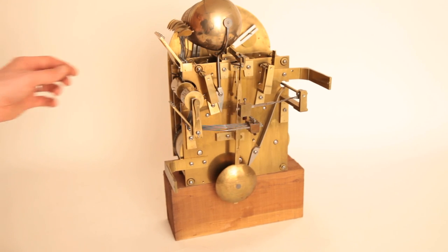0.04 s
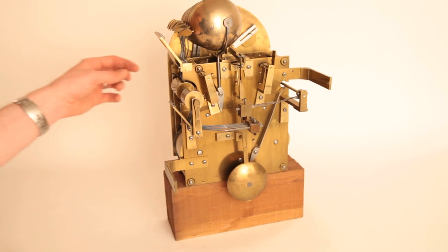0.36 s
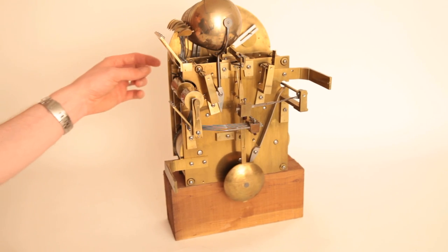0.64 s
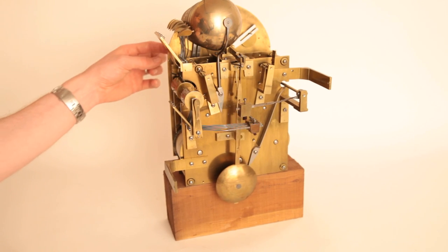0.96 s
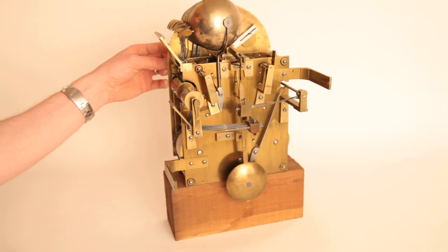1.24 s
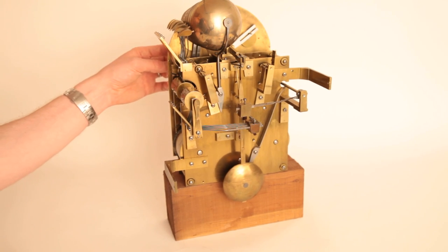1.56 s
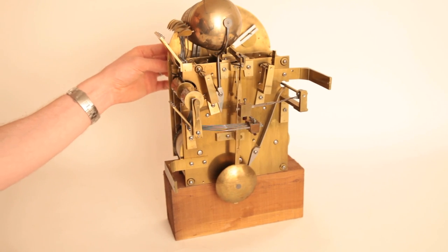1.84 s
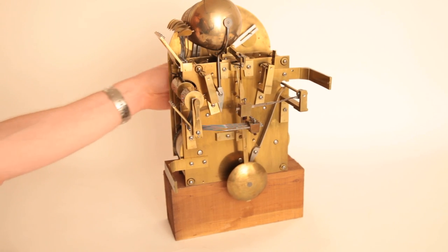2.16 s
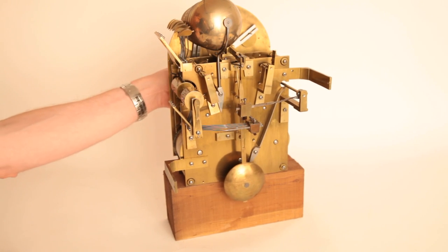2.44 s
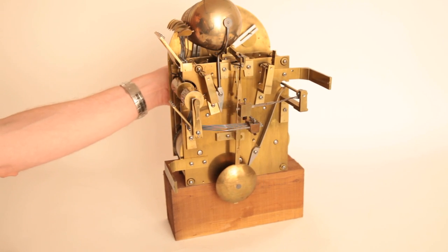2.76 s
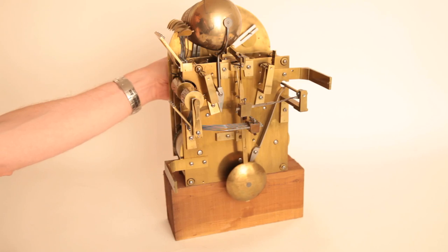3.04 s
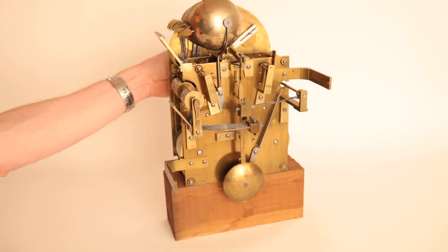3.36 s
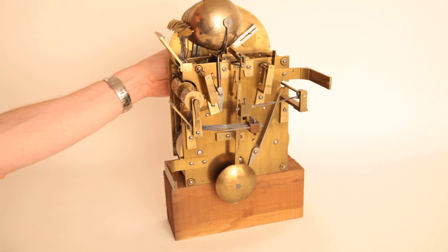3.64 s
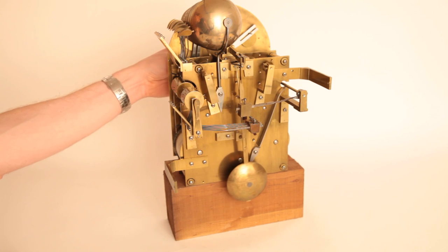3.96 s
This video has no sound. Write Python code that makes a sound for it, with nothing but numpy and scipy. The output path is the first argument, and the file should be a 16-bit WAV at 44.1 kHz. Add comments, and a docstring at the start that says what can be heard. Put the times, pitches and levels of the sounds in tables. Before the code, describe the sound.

Clockwork ticks nearby in a quiet room, alternating bright ticks and duller tocks, after a soft knock. Cloth brushes faintly and a lever clicks, then a catch snaps loudly free and brass parts briefly jangle and rattle.

```python
"""An open brass clock movement on a wooden block ticks, slightly out of beat, in a quiet room.
Each tick is a wheel tooth landing on a pallet, a small stop that rocks to and fro. Something knocks once.
Clothes brush as a hand reaches behind the clock and trips the strike train, the wheels that make it
strike: a catch snaps free, a lever drops, a springy arm jangles three times and the wheels click round.
Most hits are a burst of noise (the crack) plus a few fading tones (the ring)."""
import sys
import numpy as np
from scipy import signal
from scipy.fft import rfft, irfft, next_fast_len
from scipy.io import wavfile
from scipy.ndimage import map_coordinates

SR = 44100
rng = np.random.default_rng(int(sys.argv[2]) if len(sys.argv) > 2 else 0)


def log_audio(samples):
    """Write samples as a 16-bit WAV file to the path given in sys.argv[1]."""
    # one column per channel
    frames = np.atleast_2d(samples).T
    # limit to full scale, then quantise
    limited = np.clip(frames, -1, 1)
    pcm = np.round(limited * 32767).astype(np.int16)
    wavfile.write(sys.argv[1], SR, pcm)


N = 176400  # 4 seconds
SCENE_TIME = np.arange(N) / SR
HIT_TIME = np.arange(SR // 2) / SR  # each hit gets half a second


def amp(db):
    """Turn decibels into a number to multiply by."""
    return 10 ** (np.asarray(db) / 20)


def unit(x):
    """Scale a sound to an average strength (rms) of 1."""
    return x / np.sqrt(np.mean(x ** 2) + 1e-20)


def along(points, hz):
    """Read between the rows of a table, on a log pitch scale."""
    pitches, values = np.transpose(points)
    return np.interp(np.log(hz + 1), np.log(pitches + 1), values)


def fade(fade_s, t=HIT_TIME):
    """Die away by 60 dB every fade_s seconds."""
    return np.exp(-np.log(1000) * t / fade_s)


def rise(rise_s):
    """Climb smoothly from silence to full strength."""
    return 1 - np.exp(-(HIT_TIME / rise_s) ** 2)


def noise(colour, size):
    """Noise whose colour table says how strong each pitch is."""
    gains = amp(along(colour, np.fft.rfftfreq(size, 1 / SR)))
    return unit(irfft(rfft(rng.standard_normal(size)) * gains, size))


def wobble(rate, size=len(HIT_TIME)):
    """A smooth curve through `rate` random values a second."""
    return map_coordinates(rng.standard_normal(int(size * rate / SR) + 4), [np.arange(size) * rate / SR])


def ring(tones, rise_s, rough, peak_s=0):
    """A struck part's fading tones, roughly in step at peak_s; loose parts make them flutter."""
    flutter_db = 2.5 * rough
    out = 0
    for hz, db, fade_s in tones:
        strength = amp(db + rng.normal() + flutter_db * wobble(207))
        phase = 2 * np.pi * hz * (HIT_TIME - peak_s) + rough * wobble(153)
        out += strength * fade(fade_s) * np.sin(phase)
    return out * rise(rise_s)


def crack(colour, rise_s, fade_s, wash_db, wash_s):
    """Two parts meet: a short burst of noise, then a longer wash of many weak tones."""
    return noise(colour, len(HIT_TIME)) * rise(rise_s) * (fade(fade_s) + amp(wash_db) * fade(wash_s))


# How long the room echoes: pitch_hz, fade_s
ECHO_FADES = [(200, 0.16), (1500, 0.27), (6000, 0.23), (10000, 0.14), (15000, 0.036)]
def add(track, start_s, sound, echo_db=-10.5):
    """Put a hit on the track, with its echo from the room."""
    size = len(HIT_TIME)
    hz, t, bands = signal.stft(rng.standard_normal(size), SR, nperseg=256)
    bands *= fade(along(ECHO_FADES, hz)[:, None], t)
    tail = signal.istft(bands, SR, nperseg=256)[1][:size] * rise(0.0086)
    echo = signal.fftconvolve(sound, tail / np.linalg.norm(tail))[:size]
    part = track[round(start_s * SR):][:size]
    part += (sound + amp(echo_db) * echo)[:len(part)]


# The still air: pitch_hz, level_db
AIR_COLOUR = [(12, -40), (20, -9), (81, -4.5), (192, -6.5), (233, -12), (268, -3), (335, -10.5),
              (386, -4.5), (456, -8), (754, -4.5), (1050, -9.5), (1210, -7), (1840, -16), (12600, -32.5),
              (15800, -35)]
# Faint tones in the room: pitch_hz, level_db
HUM_TONES = [(398, -68), (739, -62.5), (761, -61), (861, -66)]
# Those tones swell a little: time_s, boost_db
HUM_SWELL = [(.3, 0.5), (1.05, 3), (1.7, 0), (3.5, 0)]
# A low rumble comes and goes: time_s, level_db
RUMBLE_LEVEL = [(0, -57), (.25, -52), (.7, -59), (1.3, -58.5), (4, -78.5)]
def room_tone():
    """The quiet room: still air, a wavering hum and a low rumble."""
    hum = 0
    for hz, db in HUM_TONES:
        strength = 1 + 0.35 * wobble(15, N)
        phase = 2 * np.pi * hz * SCENE_TIME + 1.22 * wobble(14, N)
        hum += amp(db) * unit(strength * np.sin(phase))
    hum *= amp(np.interp(SCENE_TIME, *np.transpose(HUM_SWELL)))
    rumble = noise([(15, -19), (50, -0.5), (150, -6.5), (600, -24), (3000, -63)], N)
    rumble *= amp(np.interp(SCENE_TIME, *np.transpose(RUMBLE_LEVEL)))
    return amp(-49.5) * noise(AIR_COLOUR, N) + hum + rumble


# How loudly the clothes brush: time_s, level_db
BRUSH_LEVEL = [(0, -55.5), (.13, -54), (.5, -57.5), (.95, -56.5), (1.2, -62.5), (1.9, -62.5), (2.1, -57),
               (2.35, -64), (4, -67.5)]
def clothes():
    """Cloth rubs with a soft hiss as the hand reaches in."""
    hiss = noise([(500, 5.5), (2500, -4.5), (6500, 0), (9000, -6), (14000, -24)], N)
    return amp(np.interp(SCENE_TIME, *np.transpose(BRUSH_LEVEL))) * hiss


# The knock's low ring: pitch_hz, level_db, fade_s
KNOCK_TONES = [(216, -9, .12), (299, -1, 0.13), (495, 5, 0.13), (806, -9.5, 0.16), (1136, -4, 0.16)]
# The knock's thud: pitch_hz, level_db
KNOCK_COLOUR = [(60, -20), (200, 2.5), (400, 2), (850, 3), (2000, -8.5), (3500, -14), (6000, -24.5),
                (14000, -46)]
def knock(start_s=0.078, level_db=-32):
    """One dull, wooden-sounding knock."""
    out = np.zeros(N)
    thud = crack(KNOCK_COLOUR, rise_s=0.0045, fade_s=0.13, wash_db=-7, wash_s=0.3)
    body = amp(-4.5) * ring(KNOCK_TONES, rise_s=0.0032, rough=0.56)
    add(out, start_s, amp(level_db) * (thud + body))
    return out


# The toothed wheel and its pallets ringing: pitch_hz, level_db, fade_s
WHEEL_TONES = [(2510, -5.5, .08), (3725, -8, 0.057), (5246, -3, .05), (7650, -1, 0.051), (8000, -1, 0.049),
               (8740, -13, 0.062), (11230, -15.5, .11)]
# That wheel's clearest tone: pitch_hz, level_db, fade_s
WHEEL_PING = [(5465, 0, 0.089)]
# The crack of a tooth landing: pitch_hz, level_db
TOOTH_COLOUR = [(200, -22), (1200, 5), (2800, -2), (3700, 3), (4500, 3), (5500, 4.5), (8000, -1),
                (10500, -8), (15500, -25)]
# The bright beats: start_s, crack_db, ring_db, ping_db
TICKS = [(.384, -37.5, -50, -47), (1.2852, -38.5, -40, -43), (2.1895, -41, -43.5, -46),
         (3.085, -40, -57, -40)]
def ticks():
    """A tooth falls on the first pallet and the wheel rings brightly."""
    out = np.zeros(N)
    for start_s, crack_db, ring_db, ping_db in TICKS:
        hit = amp(crack_db) * crack(TOOTH_COLOUR, rise_s=0.0007, fade_s=0.023, wash_db=-11, wash_s=0.24)
        wheel = amp(ring_db) * ring(WHEEL_TONES, rise_s=0.0012, rough=0.97)
        ping = amp(ping_db) * ring(WHEEL_PING, rise_s=0.0002, rough=1)
        add(out, start_s, hit + wheel + ping)
    return out


# The lower clack that follows each tock: pitch_hz, level_db
CLACK_COLOUR = [(200, -8), (1300, 7), (2400, 7), (3100, -6), (4000, -7), (6500, -13), (9000, -20),
                (15000, -35)]
# The dull beats: start_s, crack_db, ring_db
TOCKS = [(0.7322, -46.5, -53), (1.634, -45, -52.5), (2.5376, -47, -48), (3.4387, -47, -52.5)]
def tocks(clack_delay_s=0.0076, clack_boost_db=2):
    """On the swing back a tooth falls on the other pallet, making a duller double contact."""
    out = np.zeros(N)
    for start_s, crack_db, ring_db in TOCKS:
        hit = crack(TOOTH_COLOUR, rise_s=0.00072, fade_s=0.033, wash_db=-12.5, wash_s=0.17)
        wheel = ring(WHEEL_TONES, rise_s=0.00082, rough=0.44)
        add(out, start_s, amp(crack_db) * hit + amp(ring_db) * wheel)
        clack = crack(CLACK_COLOUR, rise_s=0.00032, fade_s=0.022, wash_db=-12, wash_s=0.14)
        add(out, start_s + clack_delay_s, amp(crack_db + clack_boost_db) * clack)
    return out


# Fingers touch the lever: start_s, level_db, pitch_hz
NUDGES = [(2.725, -42, 4330), (2.902, -51, 6960), (2.912, -55, 7000), (2.935, -47, 4740),
          (2.9435, -40, 7050), (2.947, -41, 6600), (2.955, -43, 6700), (3.6244, -38.5, 5540),
          (3.634, -32, 7350)]
def nudges():
    """The lever gives small dry clicks under the fingers."""
    out = np.zeros(N)
    for start_s, db, hz in NUDGES:
        colour = [(hz / 4, -13), (hz / 2, -8), (hz, 0), (hz * 1.16, -9), (hz * 2, -26)]
        click = crack(colour, rise_s=0.00025, fade_s=0.025, wash_db=-15.5, wash_s=0.17)
        add(out, start_s, amp(db) * click)
    return out


# The brass frame ringing: pitch_hz, level_db, fade_s
FRAME_TONES = [(307, -14.5, 0.28), (1017, -9, 0.12), (1600, -5.5, 0.13), (2199, -13, 0.15),
               (2704, -11, 0.27), (2960, -7, 0.17), (5050, -11, 0.16), (5410, -13, 0.21), (6070, -6, 0.13),
               (8500, -8, .08), (10770, -6, 0.087)]
# The noise of a tap on the frame: pitch_hz, level_db
FRAME_COLOUR = [(100, -30), (300, -1), (1500, -4), (3000, 2.5), (4300, -0.5), (8500, -1), (11500, -15),
                (15500, -13)]
# Pins meet the frame: start_s, crack_db, ring_db
PIN_CLICKS = [(3.6442, -21, -43), (3.860, -27, -31), (3.9277, -32.5, -33.5), (3.936, -37, -41),
              (3.9736, -40, -35)]
def pin_clicks():
    """Pins on the wheels click against the frame and make it ring."""
    out = np.zeros(N)
    for start_s, crack_db, ring_db in PIN_CLICKS:
        hit = crack(FRAME_COLOUR, rise_s=0.0007, fade_s=0.018, wash_db=-11.5, wash_s=0.13)
        frame = ring(FRAME_TONES, rise_s=0.001, rough=0.31)
        add(out, start_s, amp(crack_db) * hit + amp(ring_db) * frame)
    return out


# The snap of the catch: pitch_hz, level_db
CATCH_COLOUR = [(100, -36), (200, -26), (350, -9), (1000, -1.5), (2000, -5), (3000, 6.5), (3700, 0),
                (6000, -2), (8400, 0), (10000, -6.5), (15500, -14)]
def catch(start_s, level_db=-6):
    """The catch snaps free with a loud crack that rings the frame."""
    out = np.zeros(N)
    snap = crack(CATCH_COLOUR, rise_s=0.00067, fade_s=0.013, wash_db=-15.5, wash_s=0.11)
    frame = amp(-15.5) * ring(FRAME_TONES, rise_s=0.00088, rough=0.57)
    add(out, start_s, amp(level_db) * (snap + frame))
    return out


def whirr(start_s, spin_up_s=0.29):
    """The freed wheels rattle softly, growing louder as they gather speed."""
    speed = np.clip((SCENE_TIME - start_s) / spin_up_s, 0, 1)
    return speed * amp(-44 + 1.8 * wobble(120, N)) * noise(FRAME_COLOUR, N)


# The lever ringing: pitch_hz, level_db, fade_s
LEVER_TONES = [(302.6, -33, 0.48), (3905, 5, 0.033), (4800, -3, 0.033), (5270, 2.5, 0.038),
               (6060, 1.5, 0.036), (6541, -16, 0.055), (7176, -9, 0.047)]
# The crack of the lever landing: pitch_hz, level_db
LEVER_COLOUR = [(130, -45), (300, -20), (1200, -21), (1700, -1), (2700, 3), (4000, -1), (8000, 4.5),
                (11000, -2.5), (15500, -11)]
# Its two landings: start_s, crack_db, ring_db
LEVER_DROPS = [(3.6673, -10.5, -13), (3.6897, -30, -24.5)]
def lever():
    """The lever drops, rings and bounces once."""
    out = np.zeros(N)
    for start_s, crack_db, ring_db in LEVER_DROPS:
        hit = crack(LEVER_COLOUR, rise_s=0.0015, fade_s=0.028, wash_db=-20, wash_s=0.083)
        clink = ring(LEVER_TONES, rise_s=0.0022, rough=0.71)
        add(out, start_s, amp(crack_db) * hit + amp(ring_db) * clink)
    return out


# The arm's low, middle and high tones: pitch_hz, level_db, fade_s
ARM_LOW = [(1490, -1.5, 0.16), (1480, -6, .12), (1551, 2, 0.14), (1667, -3, 0.06), (1684, -2.5, 0.11),
           (1837, -5, 0.11)]
ARM_MIDDLE = [(3010, -5, .08), (3130, 5, 0.052), (3330, -5.5, 0.064), (4330, -1, 0.045)]
ARM_HIGH = [(4280, -2.5, 0.038), (5945, 2.5, 0.065), (6030, -1.5, 0.066), (6470, -3, .06),
            (6570, -14, 0.068), (7130, -5, 0.075), (7300, -6.5, .08)]
# The plate that carries the arm: pitch_hz, level_db, fade_s
PLATE_TONE = [(1014, -8.5, .16)]
# The crack of the arm on its stop: pitch_hz, level_db
ARM_COLOUR = [(120, -38), (210, -31), (310, 0.5), (750, -6.5), (1020, -10), (1250, -1.5), (2200, -4.5),
              (3200, 3), (6500, 0), (9000, -0.5), (11500, -9.5), (15500, -16)]
# The three hard hits: start_s, crack_db, low_db, middle_db, high_db
JANGLES = [(3.7111, -20, -24, -35, -19), (3.8035, -20.5, -22, -22, -59), (3.8683, -23.5, -25.5, -33, -43)]
# Light chatter against the stop: start_s, high_db
REBOUNDS = [(3.7327, -31), (3.7438, -30.5), (3.872, -28)]
def springy_arm(surge_s=0.0078, surge_width_s=0.005, echo_db=-12.5):
    """The arm hits its stop and rings high at once; a low twang follows and sets the plate humming."""
    out = np.zeros(N)
    surge = 1 + amp(-2.5) * np.exp(-((HIT_TIME - surge_s) / surge_width_s) ** 2)
    for start_s, crack_db, low_db, middle_db, high_db in JANGLES:
        hit = amp(crack_db) * crack(ARM_COLOUR, rise_s=0.00058, fade_s=0.025, wash_db=-13, wash_s=0.24)
        twang = amp(low_db) * surge * ring(ARM_LOW, rise_s=0.0061, rough=0.54, peak_s=surge_s)
        plate = amp(low_db) * ring(PLATE_TONE, rise_s=0.022, rough=0.3)
        middle = amp(middle_db) * ring(ARM_MIDDLE, rise_s=0.0024, rough=1)
        high = amp(high_db) * ring(ARM_HIGH, rise_s=0.00077, rough=0.8)
        add(out, start_s, hit + twang + plate + middle + high, echo_db)
    for start_s, high_db in REBOUNDS:
        add(out, start_s, amp(high_db) * ring(ARM_HIGH, rise_s=0.00077, rough=0.8), echo_db)
    return out


def scene(release_s=3.651, bass_cut_hz=277):
    """The clock and its room, in one channel."""
    clatter = pin_clicks() + catch(release_s) + whirr(release_s) + lever() + springy_arm()
    # Small brass parts give off little bass.
    bass_cut = signal.butter(4, bass_cut_hz, "highpass", fs=SR, output="sos")
    clatter = signal.sosfilt(bass_cut, clatter)
    return (room_tone() + clothes() + knock() + ticks() + tocks() + nudges() + clatter)[None]


def record(dry):
    """Cut off the very highest treble steeply."""
    top_hz, edge_hz = 15900, 400
    size = next_fast_len(N + SR // 2)
    ramp = np.clip((top_hz - np.fft.rfftfreq(size, 1 / SR)) / edge_hz + 0.5, 0, 1)
    return irfft(rfft(dry, size) * np.sin(ramp * np.pi / 2) ** 2, size)[:, :N]


dry = scene()
out = record(dry)
log_audio(out)
```